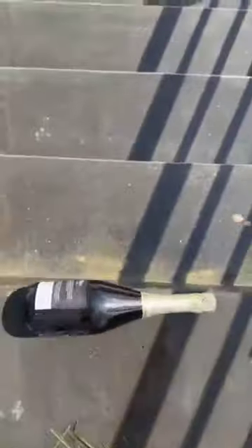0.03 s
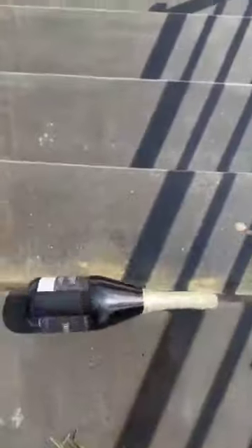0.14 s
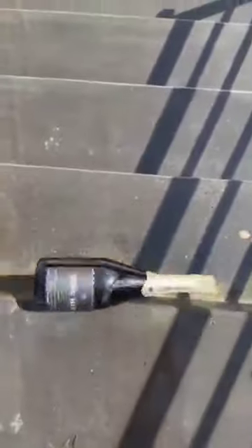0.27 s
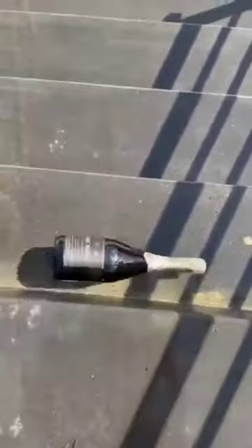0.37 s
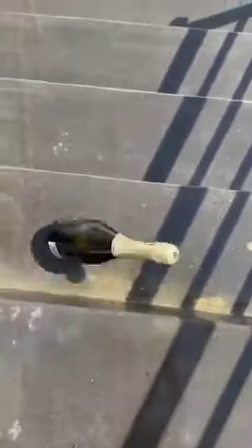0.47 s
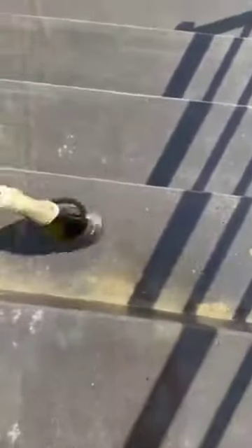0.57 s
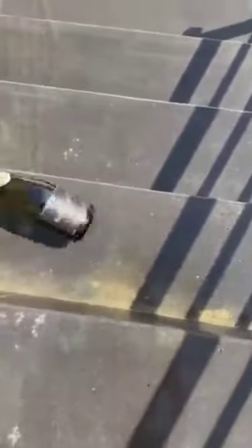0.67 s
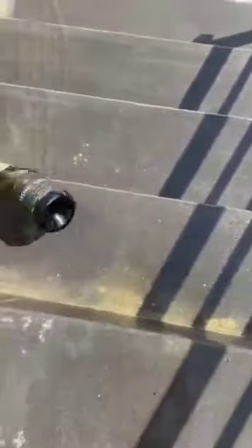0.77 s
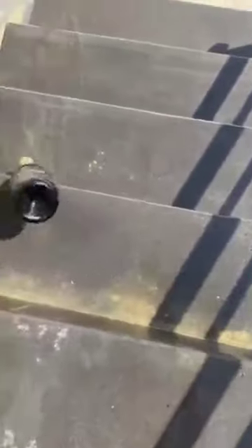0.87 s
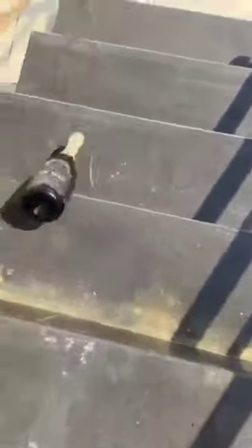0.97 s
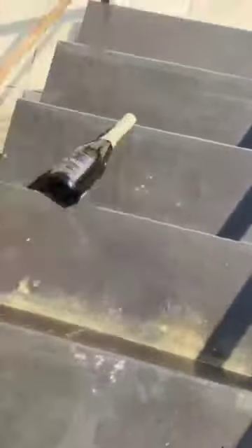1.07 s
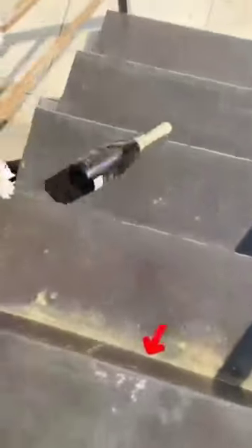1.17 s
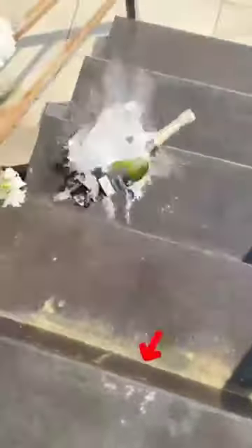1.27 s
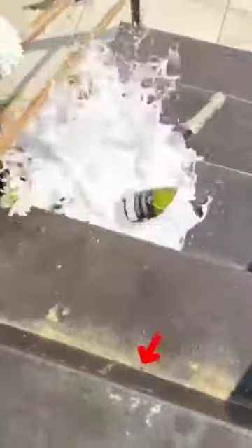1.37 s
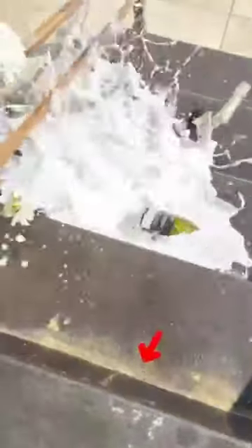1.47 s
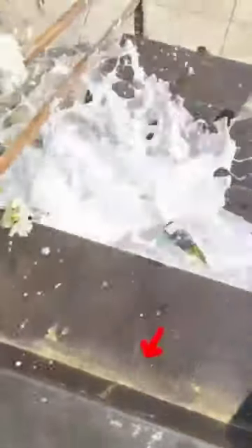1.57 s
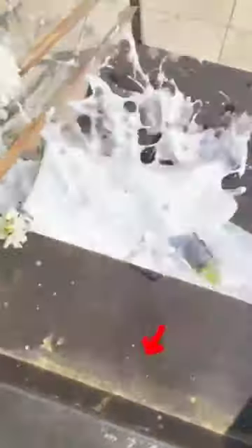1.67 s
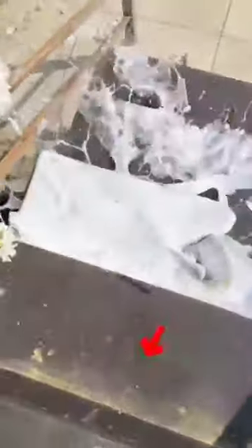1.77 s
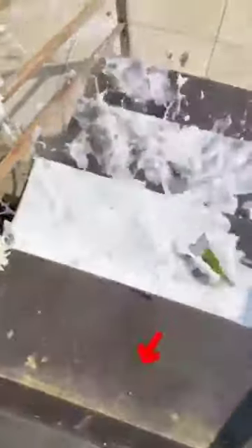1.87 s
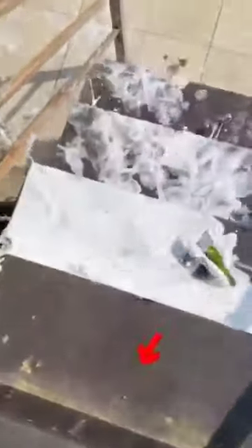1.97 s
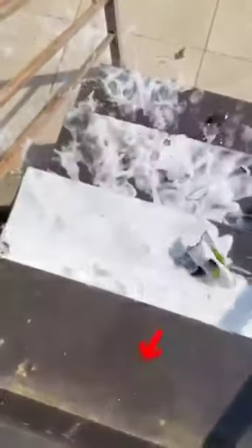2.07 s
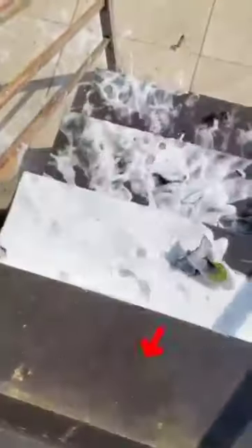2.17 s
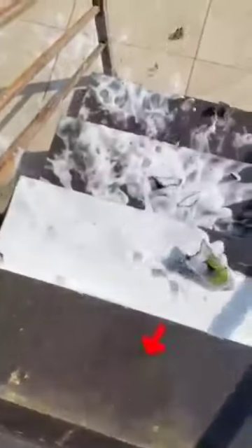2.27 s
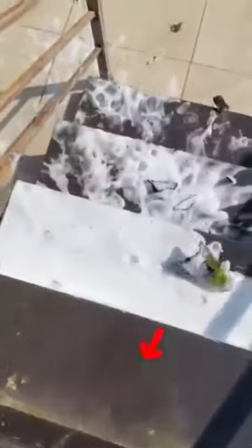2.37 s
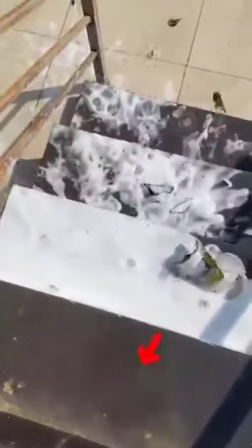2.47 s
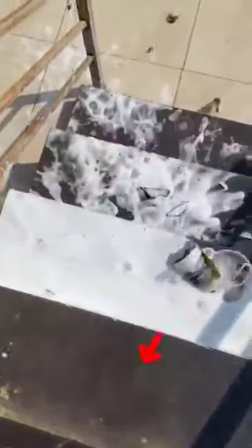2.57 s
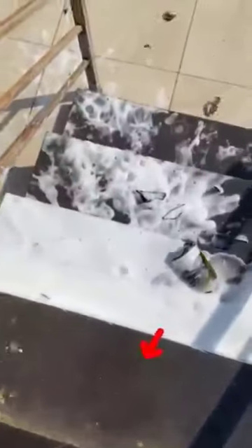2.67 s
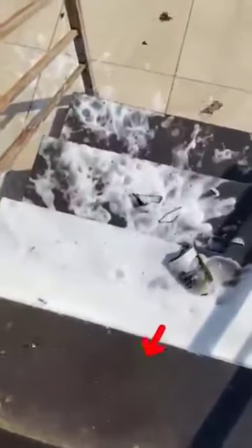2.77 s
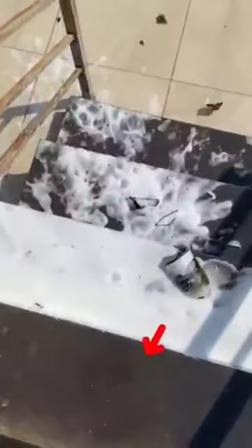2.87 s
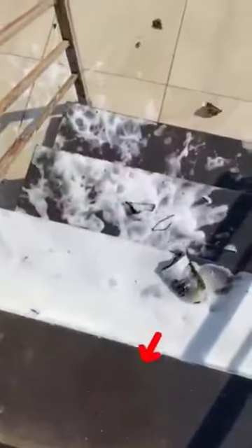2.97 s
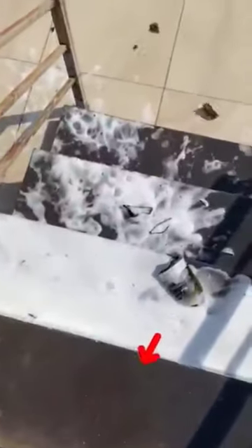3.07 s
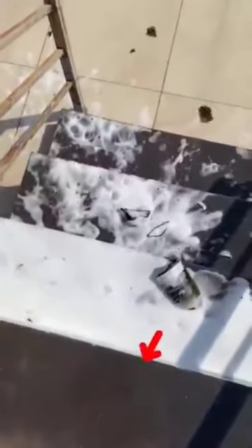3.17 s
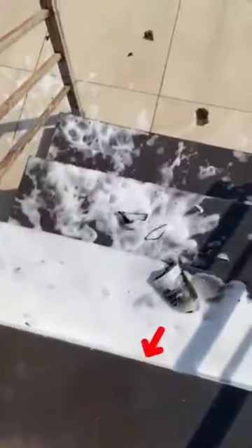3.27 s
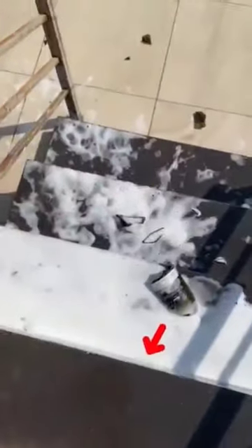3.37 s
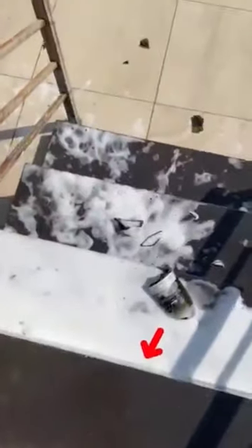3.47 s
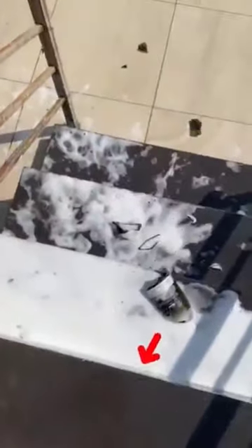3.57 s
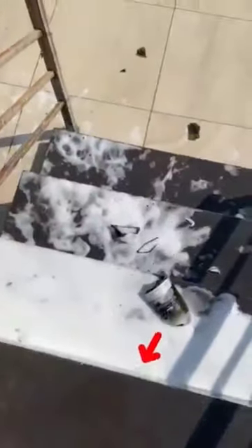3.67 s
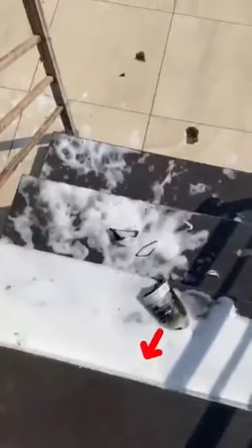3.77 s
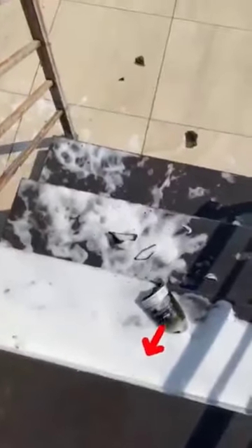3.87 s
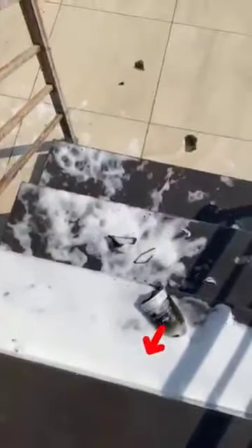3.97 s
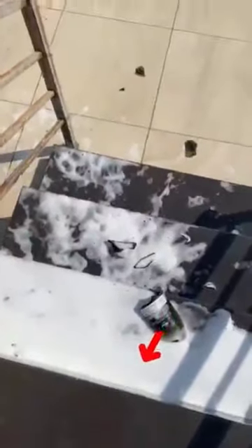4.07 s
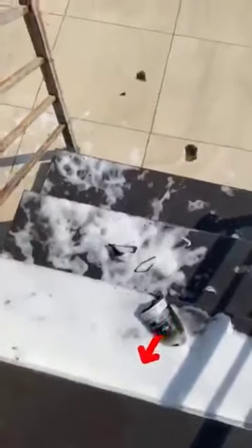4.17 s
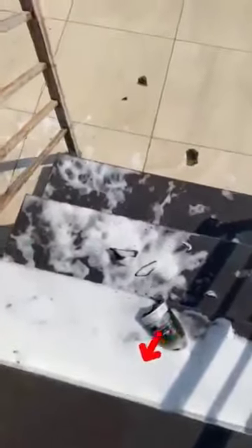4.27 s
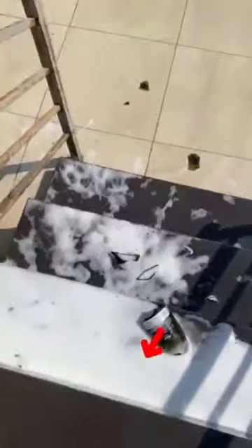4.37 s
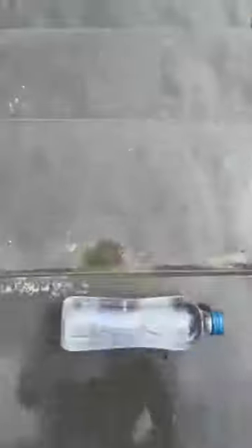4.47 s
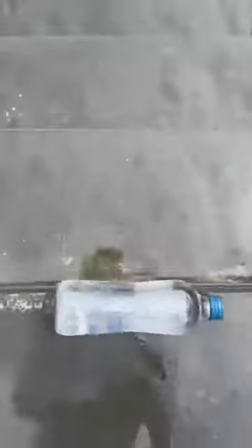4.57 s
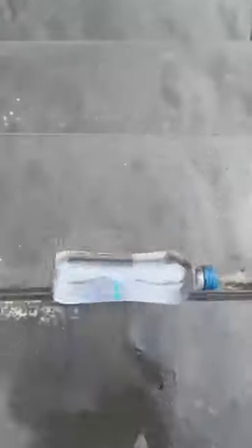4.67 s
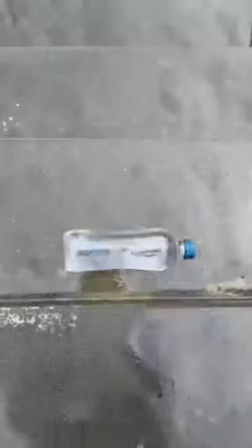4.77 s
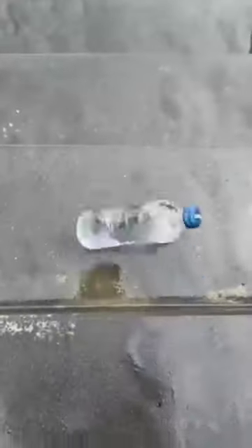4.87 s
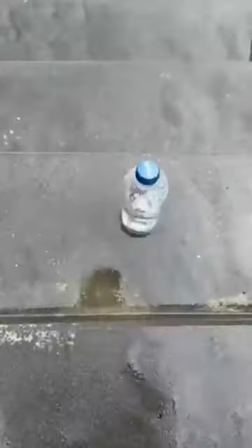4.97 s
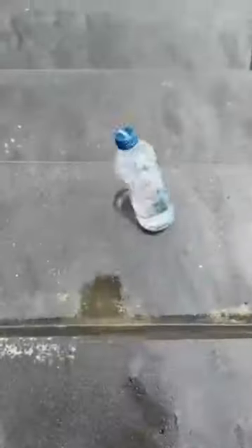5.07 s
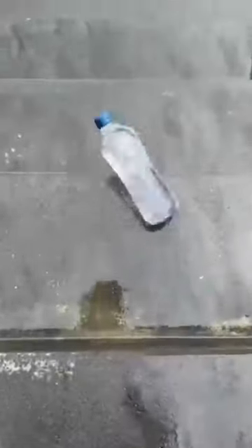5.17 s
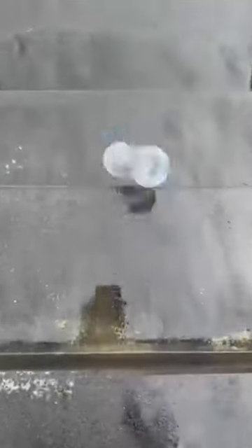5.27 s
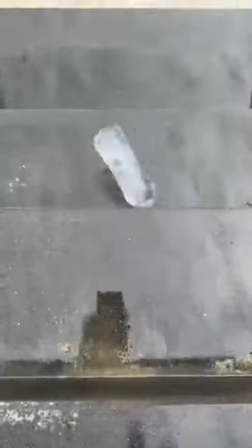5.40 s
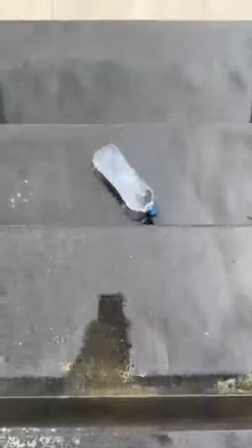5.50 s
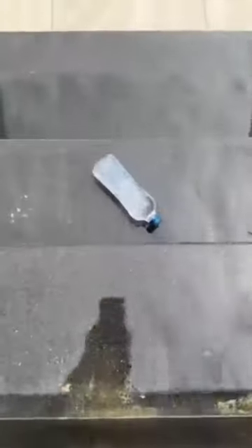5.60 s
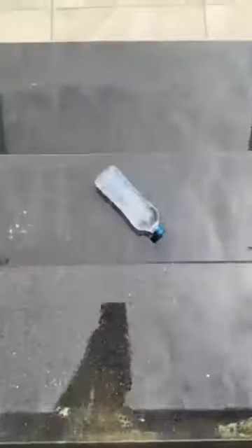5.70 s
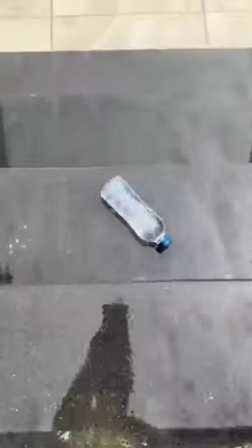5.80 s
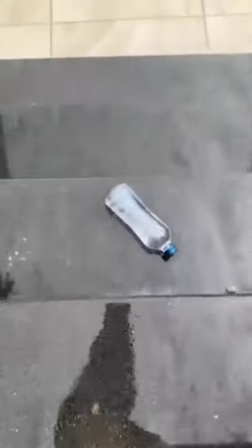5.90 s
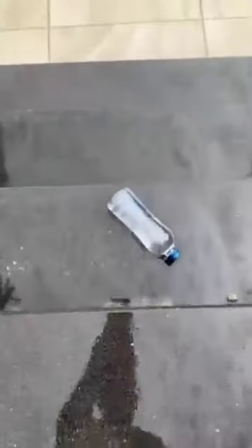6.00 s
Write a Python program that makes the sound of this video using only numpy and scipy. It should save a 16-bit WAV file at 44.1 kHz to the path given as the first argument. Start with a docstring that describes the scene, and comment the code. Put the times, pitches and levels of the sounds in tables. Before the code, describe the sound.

Heard through a phone in light wind, a heavy glass bottle clunks from step to step and smashes with a deep pop of gas. A metal railing rings, foam hisses and splatters, and pieces of glass tinkle and bounce down the lower steps. As they settle, the sound cuts to a plastic water bottle rolling with faint squeaks and clattering hollowly down the same outdoor stairs.

```python
"""In a light wind, a full glass bottle rolls and knocks down outdoor steps. At 1.25 s it bursts with
a boom of gas. Its shards ring on a metal railing, then bounce and scatter among wet splats and
fizzing foam. Near 4.57 s the sound drops out briefly at a cut between two shots. Then a plastic
water bottle rolls, squeaks and knocks down the same steps.
Both shots are heard through a phone's two microphone ports."""
import sys
import numpy as np
from scipy import signal
from scipy.fft import rfft, irfft
from scipy.io import wavfile
from scipy.ndimage import uniform_filter1d

SR = 44100
rng = np.random.default_rng(int(sys.argv[2]) if len(sys.argv) > 2 else 0)


def waveform_to_disk(signal):
    """Save audio, clipped to [-1, 1], as 16-bit WAV at the path in sys.argv[1]."""
    frames = np.transpose(np.atleast_2d(signal))
    scaled = np.clip(frames, -1, 1) * 32767
    samples = np.round(scaled).astype(np.int16)
    wavfile.write(sys.argv[1], SR, samples)


N = 266364
SIDE = np.array([[1], [-1]])  # adds to the left, takes from the right

# landings: t/s, level/dB, thud f/Hz, ring/dB re level, crack/dB re level, pan/dB (left minus right)
GLASS_LANDINGS = [(0.073, -14, 605, -20.5, -10, 4.5), (0.27, -48, 470, -12, -5, 15),
                  (0.322, -32.5, 536, -14, -5, 2), (0.454, -29.5, 870, 2, 10, 3),
                  (0.461, -22.5, 1720, -7, 11.5, -16), (0.465, -8, 1040, -3, 4.5, 2),
                  (0.512, -19.5, 1240, -23.5, -15, -2.5), (0.657, -15.5, 1066, -24, -21.5, -4),
                  (0.774, -6.5, 1060, -7, -0.5, -1), (0.866, -48, 673, -2, -4, -5),
                  (0.891, -44.5, 544, -25, 11, 3), (0.943, -37, 730, -18.5, 0, 0),
                  (0.964, -33.5, 760, -18, 0.5, -3.5), (1.071, -43, 485, -17, -3, -1.5),
                  (1.104, -37, 426, -24.5, -5, -2), (1.208, -12.5, 1400, -17.5, 6.5, -1),
                  (1.254, -10, 406, -11.5, 2.5, 10.5)]
# ring of the glass wall: f/Hz, level/dB, t60/s
GLASS_MODES = [(2540, -1.5, 0.028), (2425, 4.5, 0.03), (2450, -23, 0.2), (2950, -18.5, 0.064),
               (3670, -7.5, 0.019), (6330, -10.5, 0.031), (8600, -37, .06)]
# wine sloshing after a landing: t/s, level/dB
SLOSHES = [(.08, -25), (.78, -22.5), (.968, -27)]
# envelope of the roll: t/s, level/dB
ROLL_ENVELOPE = [(.06, -75), (.08, -54), (.19, -72), (.25, -60), (.42, -61), (.5, -60), (.66, -73)]


def glass_bottle(out, cracks):
    """The full body thuds, rings and cracks on grit; the wine sloshes; rolling grinds the wall."""
    for s, db, hz, ring_db, crack_db, pan in GLASS_LANDINGS:
        add(out, s, thud(hz, cycles=0.98, sag=0.056), db, pan)
        add(out, s, rattle(ring(GLASS_MODES, rise_s=0.00034), decay_s=0.0049), db + ring_db, pan)
        add(cracks, s, snap(0.0026), db + crack_db, pan)
    for s, db in SLOSHES:
        add(out, s, band(snap(0.029), 400, 1300), db)
    grind = signal.fftconvolve(rng.standard_normal(N), ring(GLASS_MODES, rise_s=0.00044))[:N]
    out += unit(grind) * undb(envelope_db(ROLL_ENVELOPE))


def burst(out, cracks, s=1.255, start_hz=450, end_hz=80, glide_s=.006, t60_s=0.043):
    """The freed gas bubble swings ever slower: an overdriven boom that dives in pitch."""
    t = times(.3)
    hz = end_hz + (start_hz - end_hz) * np.exp(-t / glide_s)
    swing = np.sin(2 * np.pi * np.cumsum(hz) / SR) * 1000. ** (-t / t60_s)
    add(out, s, np.tanh(13 * swing), db=-6.5, pan_db=-.5)
    add(out, s, band(snap(0.026), 33, 490), db=6)  # the wine heaves out
    add(cracks, s, snap(0.028), db=-26)


# hits on the railing: t/s, level/dB, rattle decay/s
RAILING_HITS = [(1.363, -28, 0.003), (1.3745, -12, 0.022), (1.409, -29.5, 0.035), (1.622, -48, .004),
                (1.783, -32, 0.0019)]
# ring of the bars: f/Hz, level/dB, t60/s
RAILING_MODES = [(393, -23.5, 1.8), (679, -24, 0.71), (847, -31.5, 0.9), (965.6, -29, 0.89),
                 (1060, -20, 0.49), (1440, -10, 0.45), (1733, -23.5, 0.96), (1797, -39.5, 0.36),
                 (2143, -9.5, 0.37), (2385, -41, 0.21), (2310, -26.5, 0.22), (2930, -7, 0.18),
                 (3160, -21, 0.99), (2942, -24, 0.8), (3060, -26.5, 1.4), (3480, -24, 0.96),
                 (3520, -16, 0.31), (3682, -29, 0.43), (3770, -17, 0.27), (4240, -12, 0.28),
                 (4700, -20.5, 0.38), (4970, -20, 0.29), (4600, -29.5, 0.53), (8050, -8, 0.067),
                 (8400, -20.5, 0.17), (9080, -26, .08), (9500, -17, 0.17)]


def railing(out, cracks):
    """Thrown shards pelt the metal bars, which ring on."""
    for s, db, rattle_s in RAILING_HITS:
        add(out, s, rattle(ring(RAILING_MODES, rise_s=0.00067), rattle_s), db, pan_db=-.5)
        add(cracks, s, snap(rattle_s), db + 10.5)


# bounces of the base: t/s, level/dB, mid ring/dB re level, top ring/dB re level
BASE_BOUNCES = [(1.8603, -24, -2.5, -1), (1.8766, -29.5, -40, -31), (1.9071, -27.5, -38, -36),
                (2.1033, -17, 3, -11.5), (2.6316, -18, -8.5, -12.5), (3.1163, -12.5, -12.5, -22),
                (3.405, -33.5, -4.5, -15.5), (3.5816, -35, 0.5, -21), (3.7577, -29, -10, -32.5),
                (3.8737, -32.5, -13.5, -25)]
# its low, mid and top ring: f/Hz, level/dB, t60/s
BASE_LOW_MODES = [(3207, -0.5, 0.13), (3257, -15.5, 0.46), (3160, 1.5, 0.1), (3345, -13, .08),
                  (2167, -30, 0.076)]
BASE_MID_MODES = [(4095, 2.5, 0.14), (4300, -9, 0.18), (4060, -1, 0.046), (5300, -25, .1)]
BASE_TOP_MODES = [(7773, 8, 0.076), (7530, -5, 0.047), (7100, -14, 0.15), (9530, -4, 0.082),
                  (9630, 7.5, 0.14)]


def bottle_base(out, cracks, pan_db=1.5):
    """The thick glass base rings with the same modes at every bounce, in a new balance."""
    for s, db, mid_db, top_db in BASE_BOUNCES:
        for modes, rel_db in ((BASE_LOW_MODES, 0), (BASE_MID_MODES, mid_db), (BASE_TOP_MODES, top_db)):
            add(out, s, rattle(ring(modes, rise_s=0.00015), decay_s=0.005), db + rel_db, pan_db)
        add(cracks, s, snap(0.0098), db + top_db + 10, pan_db)
        add(out, s, band(snap(0.041), 5700, 10000), db + top_db + 7.5, pan_db)  # haze of close modes


# clinks: t/s, level/dB, main mode f/Hz, t60/s, high mode/dB re level, crack/dB re level, pan/dB
SHARD_CLINKS = [(1.6208, -20, 2690, 0.042, -7.5, -15.5, 3), (1.716, -37, 3840, 0.016, -21, 0, 2),
                (1.7625, -34, 3580, 0.029, -27, 8.5, 1), (1.784, -24, 3540, 0.058, -19, 2.5, 1),
                (1.8183, -31.5, 3900, 0.045, -5.5, -11, 2), (1.9699, -12.5, 3510, 0.06, -20.5, -2, -0.5),
                (1.9938, -27.5, 3500, 0.076, -0.5, 9.5, 8.5), (2.0115, -11, 4244, 0.051, -8, -6.5, 1.5),
                (2.0287, -21.5, 4230, .093, -11, -0.5, -10.5), (2.065, -34, 2260, .1, -2, 6, 13),
                (2.12, -23.5, 4100, 0.031, -9, 6.5, 7), (2.3446, -44.5, 3380, .1, 10.5, 13, 2),
                (2.394, -40.5, 2570, .038, -35, 10, -5), (2.422, -41.5, 3520, 0.14, -4, 10, -2.5),
                (2.4651, -23, 2380, 0.017, -21, -3, 1.5), (2.5848, -17.5, 3150, 0.019, -1, 6, 0),
                (2.609, -28.5, 2180, 0.11, -36, -3, 12), (2.6936, -16.5, 3580, 0.09, -22, -1.5, 1.5),
                (2.696, -25, 2172, 0.16, -18, -5, 9.5), (2.7628, -35, 3210, 0.11, -19, 12.5, 0),
                (2.8834, -27.5, 2580, 0.017, -29, 4, -0.5), (2.9469, -21.5, 4710, .048, -3, -5.5, 0),
                (2.946, -41.5, 1197, 0.29, -19.5, -3, 11), (2.9881, -21, 2396, 0.023, -40, 1.5, -3.5),
                (3.0664, -38, 2450, 0.14, -40, -7.5, -7.5), (3.16, -41.5, 2214, 0.28, 1, 11, 6.5),
                (3.234, -37.5, 4560, 0.06, -25.5, -7, -1.5), (3.2901, -43, 4190, .046, -2.5, 6, 13),
                (3.292, -51, 1156, 0.11, -8, 0, -5), (3.349, -49, 1273, .1, -15, 2, -3),
                (3.623, -29, 3186, .17, -21.5, -9, 4.5), (3.7901, -26, 3240, .08, -45, -11.5, 1.5),
                (4.0657, -49, 2980, 0.084, -16, -0.5, -8.5)]


def loose_shards(out, cracks):
    """Each shard clinks with three modes of its own, the highest scattered around 8 kHz."""
    high_hzs = 7965 * (1 + 0.069 * rng.standard_normal(len(SHARD_CLINKS)))
    for (s, db, hz, t60, high_db, crack_db, pan), high_hz in zip(SHARD_CLINKS, high_hzs):
        modes = [(hz, -3, t60), (hz * 0.86, -12, 0.25 * t60), (high_hz, high_db, min(1.1 * t60, .18))]
        add(out, s, rattle(ring(modes, rise_s=0.001), decay_s=0.0021), db, pan)
        add(cracks, s, snap(0.017), db + crack_db, pan)


# ring of the large shard: f/Hz, level/dB, t60/s
LARGE_SHARD_MODES = [(2910, -9.5, 0.024), (3070, -44.5, 0.99), (3040, -2.5, 0.076), (6970, -13, 0.11),
                     (7600, -23, 0.13), (7400, -5.5, 0.04), (7510, -28, 0.19)]


def large_shard(out, cracks, s=3.8926, pan_db=2):
    """A large piece comes to rest with one bright clink."""
    add(out, s, rattle(ring(LARGE_SHARD_MODES, rise_s=0.00033), decay_s=0.0021), -7.5, pan_db)
    add(cracks, s, snap(0.011), -22.5, pan_db)


# wet landings: t/s, level/dB, f/Hz, pan/dB
WET_LANDINGS = [(1.62, -18.5, 1370, 3), (1.664, -27.5, 870, 0), (1.733, -8, 920, -4),
                (1.783, -16.5, 1630, -7), (1.796, -17.5, 1450, -2.5), (1.821, -28, 530, -10),
                (2.005, -30.5, 1050, 5), (2.09, -26.5, 1316, -6), (2.145, -22.5, 1430, -5),
                (2.468, -35, 1460, -9), (2.556, -20.5, 660, -4), (2.691, -29.5, 1490, -7),
                (2.884, -34.5, 970, -1), (3.176, -37, 1320, -8), (3.789, -47, 1205, -2),
                (3.863, -50, 1100, -8), (4.134, -56, 748, 7), (4.222, -37, 1279, 6.5), (4.225, -43, 407, 2)]


def splats(out, cracks):
    """Wet lumps land dully; the harder the hit, the more its pitch sags."""
    for s, db, hz, pan in WET_LANDINGS:
        add(out, s, thud(hz, cycles=2.5, sag=0.13 + 2.4 * undb(db)), db, pan)
        add(out, s, band(snap(0.0056), 600, 4000), db - 3.5, pan)


# knocks and scuffs: t/s, level/dB, f/Hz, crack/dB re level, pan/dB
PLASTIC_KNOCKS = [(4.81, -57, 2510, 16, 6), (4.901, -2, 2270, -17, 5.5), (5.084, -11.5, 988, -3, -3.5),
                  (5.115, -36.5, 974, -10, -3.5), (5.225, -45, 958, -8, -6), (5.258, -41.5, 1105, -7, -3.5),
                  (5.309, -2, 2620, 1, 2), (5.312, -13, 460, -10.5, 0), (5.527, -38, 1800, 4, 8),
                  (5.537, -2.5, 2340, -9, -3.5), (5.568, -5.5, 1590, -4, -4), (5.58, -18, 2004, -12, 2),
                  (5.615, -9.5, 1970, -18, -1), (5.678, -19, 1700, -26, -2.5),
                  (5.693, -10, 1630, -2.5, -0.5), (5.6995, -9.5, 2270, -15, -2), (5.729, -28, 1550, -9, 2),
                  (5.771, -28, 1220, -22, -6.5), (5.784, -27, 1440, -20, -1.5), (6.014, -60, 895, 16, -6)]
PLASTIC_SCUFFS = [(4.655, -35.5, 1250, -11.5, -2.5), (4.675, -30, 1300, -20, -6.5),
                  (4.692, -46, 3300, 14.5, 12), (4.766, -23.5, 1730, -7.5, -4), (4.893, -33.5, 908, 11, 1),
                  (4.905, -3.5, 1680, -4.5, -5.5), (5.747, -15, 1560, -12.5, -2)]
# hollow ring of the plastic: f/Hz, level/dB, t60/s
HOLLOW_MODES = [(1560, -1, 0.01), (1980, -1, 0.0086), (2367, 5, 0.0061), (2870, -11, 0.012),
                (4100, -41, 0.016), (5030, -24.5, 0.027), (5750, -13.5, 0.015)]


def plastic_bottle(out, cracks):
    """Dry knocks with a hollow after-ring; a scuff stays in contact longer."""
    for hits, contact_s in ((PLASTIC_KNOCKS, 0.0028), (PLASTIC_SCUFFS, 0.0092)):
        for s, db, hz, crack_db, pan in hits:
            add(out, s, thud(hz, cycles=0.9, sag=0.19), db, pan)
            add(out, s, rattle(ring(HOLLOW_MODES, rise_s=0.0014), contact_s), db - 3.5, pan)
            add(cracks, s, snap(contact_s), db + crack_db, pan)
            add(out, s, band(snap(0.13), 1500, 9500), db - 52, pan)  # the water sloshes


# squeaks: t/s, length/s, starting f/Hz, level/dB
WALL_SQUEAKS = [(4.598, .05, 1750, -67.5), (4.641, 0.056, 1730, -49), (4.699, 0.053, 1760, -43),
                (4.756, 0.057, 1723, -36), (4.825, 0.059, 1724, -39), (4.921, 0.013, 1790, -32.5)]


def squeaks(out, cracks, sag_hz_per_s=1000, fade_s=.008):
    """The rolling plastic wall squeaks in short, unsteady, falling tones."""
    waver = 1 + 0.0092 * walk(67)
    flicker = undb(1.8 * walk(60))
    for s, length, hz, db in WALL_SQUEAKS:
        t = np.arange(N) / SR - s
        gate = np.clip(np.minimum(t, length - t) / fade_s + .5, 0, 1) ** 2
        pitch = (hz - sag_hz_per_s * np.clip(t, 0, length)) * waver
        out += np.sqrt(2) * undb(db) * gate * flicker * np.sin(2 * np.pi * np.cumsum(pitch) / SR)


# spurts of splinters and foam: t/s, level/dB
SPURTS = [(1.256, -40.5), (1.369, -30), (1.6, -46), (1.969, -43), (2.2, -54), (2.36, -53), (2.58, -41.5),
          (2.9, -54), (3.1, -54), (3.4, -66), (3.751, -63), (4.0, -67), (4.25, -71)]
# tone of the fizz: f/Hz, level/dB
FIZZ_EQ = [(240, -33), (400, -18.5), (866, -15.5), (1480, 3), (1670, -25.5), (3500, 10.5), (5040, -8),
           (5920, -42.5), (7810, -5), (8900, -10.5), (9860, -19.5), (10600, -65.5), (13000, -69)]


def splinters_and_foam(count=1800, end_s=4.3, attack_s=.02, decay_s=.16):
    """Splinters tinkle briefly at their own pitch over fizzing foam; both come in spurts."""
    tinkle, t = np.zeros((2, N)), times(.04)
    start_s = SPURTS[0][0]
    for when, pitch, size, place in rng.random((count, 4)):
        hz = 1100 * 9. ** pitch
        ping = np.sin(2 * np.pi * hz * t) * np.exp(-t / (.0008 + .008 * place ** 5)) / np.sqrt(hz)
        add(tinkle, start_s + (end_s - start_s) * when, ping, 20 * size ** 3, 7.3 * (place - .5))
    tinkle /= np.sqrt(np.mean(tinkle[:, int(start_s * SR):int(end_s * SR)] ** 2))
    fizz = unit(colour(stereo_noise(width=.5), FIZZ_EQ))
    swell = np.zeros(N)
    for s, db in SPURTS:
        age = np.maximum(np.arange(N) / SR - s, 0)
        swell += undb(db) * (1 - np.exp(-age / attack_s)) * np.exp(-age / decay_s)
    return (tinkle + undb(-4) * fizz) * swell * undb(4 * walk(31))


# envelope of the gusts: t/s, level/dB
GUST_ENVELOPE = [(0, -49), (.36, -46.5), (.5, -70.5), (.86, -59.5), (1.14, -63.5), (1.38, -37.5),
                 (1.85, -46.5), (2.2, -62.5), (2.75, -63), (3.45, -74), (4.3, -68), (4.55, -74),
                 (4.61, -48), (4.68, -29.5), (4.76, -35.5), (4.864, -18), (4.93, -44.5), (5.17, -49),
                 (5.24, -37.5), (5.35, -33.5), (5.39, -41), (5.43, -37.5), (5.53, -50.5), (5.66, -55.5),
                 (5.78, -40.5), (5.81, -49.5), (5.85, -35.5), (5.92, -54), (5.97, -40), (6.0, -55),
                 (6.04, -38)]


def wind():
    """Gusts thump on both ports nearly alike; their patchy flutter is stronger on the right."""
    rumble = unit(band(stereo_noise(width=0.089), 38, 190) * undb(4.9 * walk(35)))
    flutter = band(band(stereo_noise(width=0.18), 280, 550), 140, 710)
    flutter = unit(flutter * undb(5.9 * walk(40)))
    return undb(envelope_db(GUST_ENVELOPE)) * (rumble + undb(-13.5 - 1.5 * SIDE) * flutter)


# envelope of the drone: t/s, level/dB
DRONE_ENVELOPE = [(0, -65.5), (1.2, -69), (1.3, -53), (2.0, -57.5), (2.5, -66.5), (3.3, -61), (3.6, -75),
                  (4.55, -66), (4.6, -72.5), (6.04, -73.5)]


def drone():
    """A deep rumble under everything."""
    return unit(band(stereo_noise(width=0.15), 22, 59)) * undb(envelope_db(DRONE_ENVELOPE))


# tone of the hiss: f/Hz, level/dB
HISS_EQ = [(180, -27.5), (300, -8), (565, -8.5), (1180, -13), (2160, -16.5), (2450, -14), (4750, -26),
           (6280, -30.5), (9230, -30.5), (12000, -61.5), (15600, -93), (22000, -120)]
# envelope of the hiss: t/s, level/dB
HISS_ENVELOPE = [(0, -63.5), (1, -63), (1.24, -72), (1.36, -48.5), (1.7, -42.5), (2.4, -72), (2.56, -46),
                 (3.1, -68.5), (4.64, -77), (4.79, -58), (4.95, -62.5), (5.82, -66.5), (6.04, -76.5)]


def air():
    """A faint wide hiss that swells while the foam spreads and the bottles roll."""
    hiss = unit(colour(stereo_noise(width=1), HISS_EQ))
    return hiss * undb(envelope_db(HISS_ENVELOPE) + 0.26 * walk(7))


# envelope of the hum: t/s, level/dB
HUM_ENVELOPE = [(3.95, -92), (4.1, -77), (4.33, -73.5), (4.4, -82.5), (4.5, -79), (4.56, -86)]


def hum(hz=750):
    """A faint narrow tone far away."""
    return unit(band(rng.standard_normal(N), hz - 12, hz + 12)) * undb(envelope_db(HUM_ENVELOPE))


def dropout(s=4.556, length_s=.024, fade_s=.012):
    """Gain that drops the background for a moment at the cut between the two shots."""
    t = np.arange(N) / SR - s
    return np.clip(np.maximum(-t, t - length_s) / fade_s, .02, 1)


def echo(x, db=-20.5, t60_s=0.12):
    """Steps and walls send back a short echo, different at each port."""
    t = times(.4)
    tail = band(rng.standard_normal((2, len(t))), 600, 12000) * 1000. ** (-t / t60_s) * (t > .002)
    tail /= np.sqrt((tail ** 2).sum(axis=1, keepdims=True))
    return undb(db) * signal.fftconvolve(x, tail, axes=1)[:, :N]


def ring(modes, rise_s, scatter_db=1.5, waver_db=3, waver_per_s=90):
    """Decaying modes, weighted anew at each blow; they waver as the piece turns and touches."""
    hz, db, t60 = np.transpose(modes)[:, :, None]
    t = times(.8 * t60.max())
    weight, phase = rng.standard_normal((len(hz), 2)).T[:, :, None]
    knots = rng.standard_normal((len(hz), 200))
    waver = np.array([np.interp(t * waver_per_s, np.arange(len(k)), k - k[0]) for k in knots])
    gain = undb(db + scatter_db * weight + waver_db * waver) * 1000. ** (-t / t60)
    partials = gain * np.sin(2 * np.pi * hz * t + 2 * phase)
    return partials.sum(axis=0) * (1 - np.exp(-t / rise_s))


def rattle(x, decay_s, contacts_per_s=900):
    """A blow is many small contacts that follow the first and die away; the energy stays."""
    t = times(.15)
    contacts = rng.random(len(t)) < contacts_per_s / SR
    taps = 0.51 * contacts * rng.standard_normal(len(t)) * np.exp(-t / decay_s)
    taps[0] = 1
    rattled = signal.fftconvolve(x, taps)
    return rattled * np.sqrt(np.sum(x ** 2) / np.sum(rattled ** 2))


def thud(hz, cycles, sag):
    """A damped knock whose pitch sags through hz as the contact spreads; peak 1."""
    turns = times(4 * cycles / hz) * hz * (1 + sag * cycles / 2)
    x = np.sin(2 * np.pi * np.log1p(sag * turns) / sag) * turns * np.exp(-2 * turns / cycles / (1 + sag))
    return x / np.abs(x).max()


def snap(decay_s):
    """A short burst of white noise."""
    t = times(.2)
    return rng.standard_normal(len(t)) * np.exp(-t / decay_s) * np.cos(np.pi * t / .4) / 2


def stereo_noise(width):
    """White noise: a centre plus width times as much side."""
    return rng.standard_normal(N) + width * SIDE * rng.standard_normal(N)


def walk(rate):
    """Random levels held 1 / rate s and slewed twice."""
    hold = int(SR / rate)
    steps = np.repeat(rng.standard_normal(N // hold + 1), hold)
    return uniform_filter1d(uniform_filter1d(steps, hold), hold)[:N]


def times(length_s):
    return np.arange(int(length_s * SR)) / SR


def undb(db):
    return 10 ** (np.asarray(db) / 20)


def unit(x):
    return x / np.sqrt(np.mean(x ** 2))


def envelope_db(points):
    """Level at every sample, silent outside the points."""
    return np.interp(np.arange(N) / SR, *np.transpose(points), left=-120, right=-120)


def band(x, lo_hz, hi_hz):
    return signal.sosfilt(signal.butter(2, [lo_hz, hi_hz], "bandpass", fs=SR, output="sos"), x)


def colour(x, eq):
    """Minimum-phase EQ through f/Hz, level/dB points."""
    hz, db = np.transpose(eq)
    gain_db = np.interp(np.log(np.linspace(1, SR / 2, 513)), np.log(hz), db)
    cepstrum = irfft(gain_db * np.log(10) / 20)
    cepstrum[1:512] *= 2  # fold onto positive time
    cepstrum[513:] = 0
    impulse = irfft(np.exp(rfft(cepstrum)))[None, :512]
    return signal.fftconvolve(x, impulse, axes=1)[:, :N]


def add(out, s, x, db, pan_db=0.):
    """Mix a sound in at time s; pan_db is left minus right."""
    i = int(s * SR)
    x = x[:N - i]
    out[:, i:i + len(x)] += x * undb(db + SIDE * pan_db / 2)


# tone of the contact cracks: f/Hz, level/dB
CRACK_EQ = [(300, -25.5), (1000, -3), (3000, -0.5), (5000, -2), (6300, -3), (8000, -6.5), (9800, -5.5),
            (11000, -14.5), (16000, -20)]


def submix(*sources):
    """Play sources onto a plain bus and a crack bus with its own EQ, and sum the two."""
    out, cracks = np.zeros((2, N)), np.zeros((2, N))
    for source in sources:
        source(out, cracks)
    return out + colour(cracks, CRACK_EQ)


def lag_left(x, phases):
    """The left port hears the treble later."""
    hz = np.linspace(0, SR / 2, N // 2 + 1)
    phase = np.interp(hz, *np.transpose(phases))
    return np.array([irfft(rfft(x[0]) * np.exp(1j * phase), N), x[1]])


# left port against right, from the upper and the lower steps: f/Hz, phase/rad
NEAR_PHASE = [(0, 0), (3500, -.6), (7200, -1.4), (10300, -3.1), (16000, -3.3)]
FAR_PHASE = [(0, 0), (2150, 0), (3200, -1), (4570, -1.9), (7240, -3.4), (9220, -6.2), (16000, -9)]
# tone of the debris, with a dip near 5.6 kHz and treble ending near 10 kHz: f/Hz, level/dB
DEBRIS_EQ = [(300, -9), (5100, 1.5), (5600, -9), (7000, -1), (7500, 0), (9900, -13), (10500, -30),
             (16000, -31.5)]


def scene():
    """Bottles up close, debris on the lower steps, their echo and the outdoor bed."""
    bottles = submix(glass_bottle, burst, plastic_bottle, squeaks)
    debris = submix(railing, bottle_base, loose_shards, large_shard, splats) + splinters_and_foam()
    direct = lag_left(bottles, NEAR_PHASE) + lag_left(colour(debris, DEBRIS_EQ), FAR_PHASE)
    return direct + echo(direct) + (air() + hum() + wind() + drone()) * dropout()


def record(dry):
    """The phone rounds the loudest peaks and cuts the top above 16.4 kHz."""
    soft = .9 * np.tanh(dry / .9 + (dry / .9) ** 3 / 3)
    return signal.sosfilt(signal.ellip(8, .2, 70, 16400, fs=SR, output="sos"), soft)


dry = scene()
out = record(dry)
waveform_to_disk(out)
```